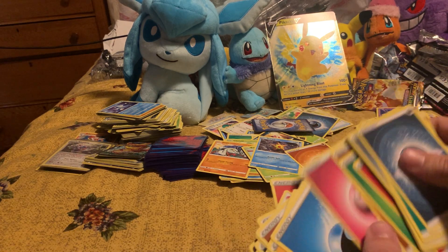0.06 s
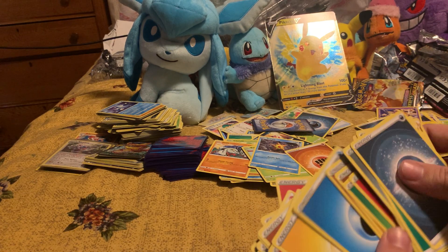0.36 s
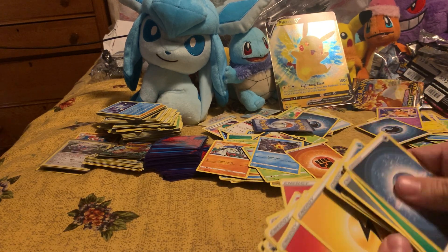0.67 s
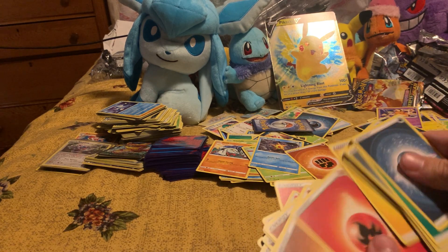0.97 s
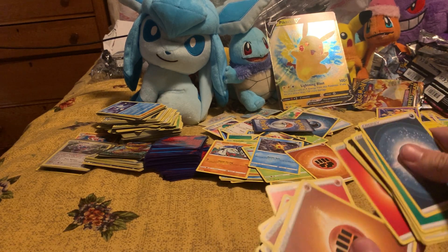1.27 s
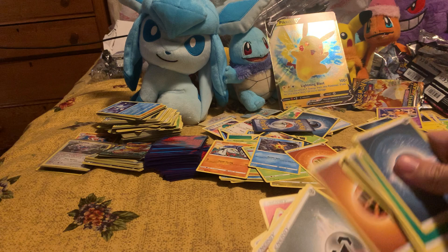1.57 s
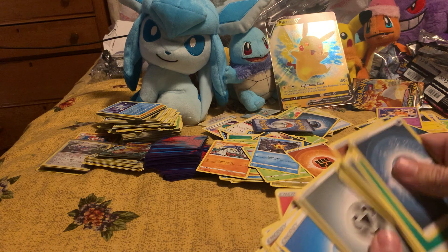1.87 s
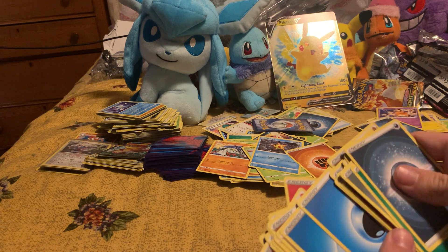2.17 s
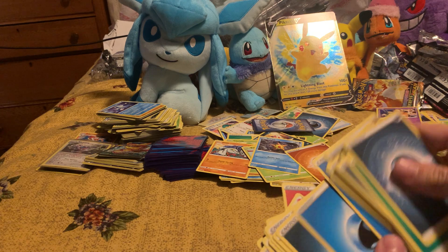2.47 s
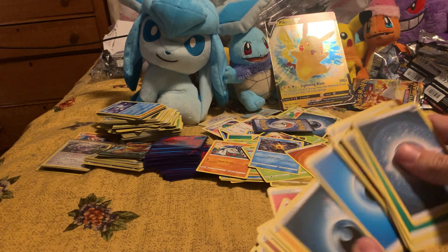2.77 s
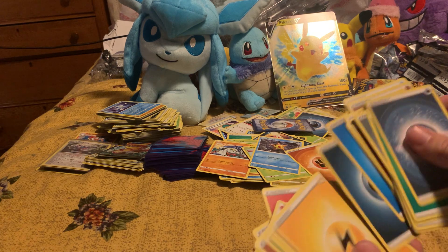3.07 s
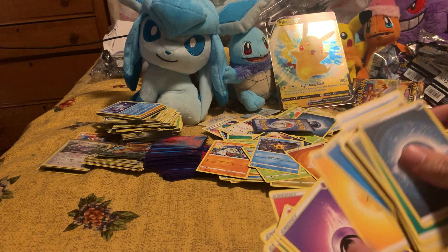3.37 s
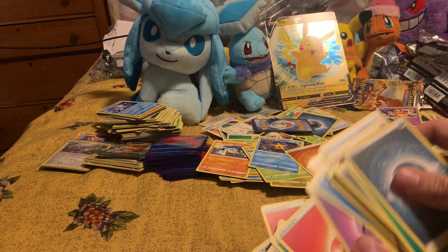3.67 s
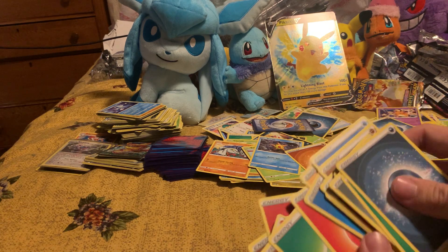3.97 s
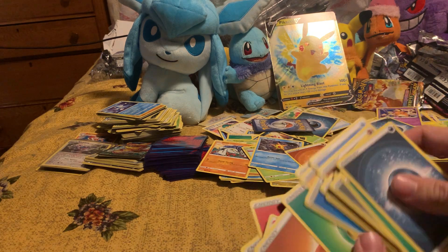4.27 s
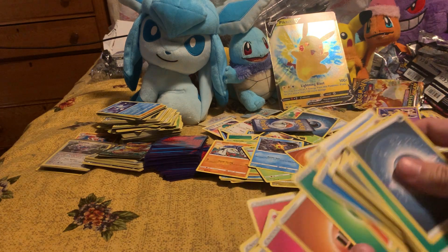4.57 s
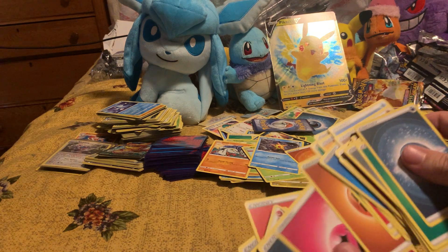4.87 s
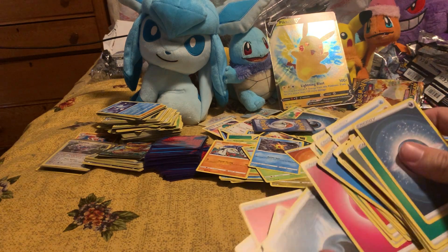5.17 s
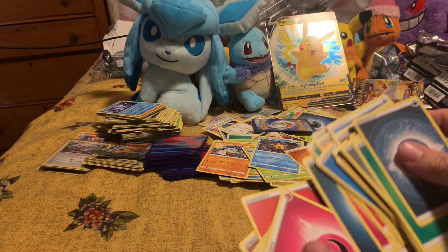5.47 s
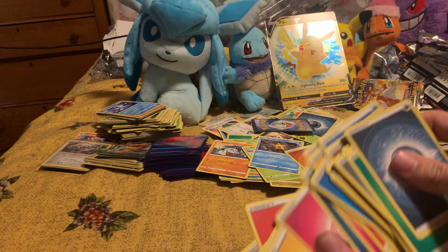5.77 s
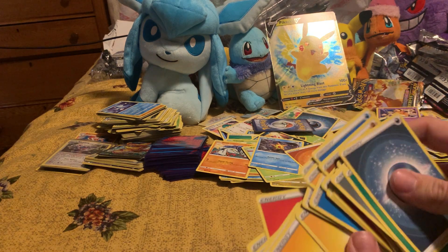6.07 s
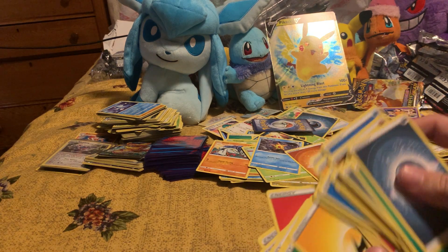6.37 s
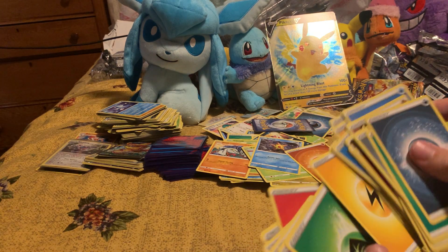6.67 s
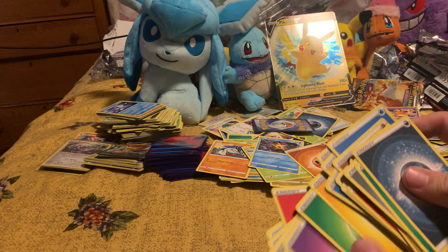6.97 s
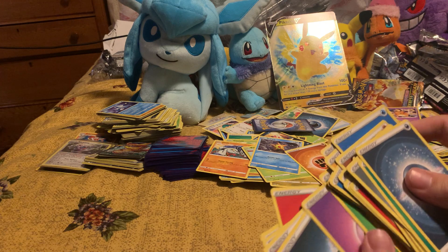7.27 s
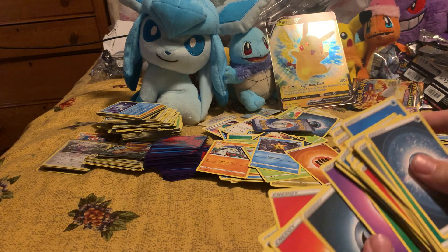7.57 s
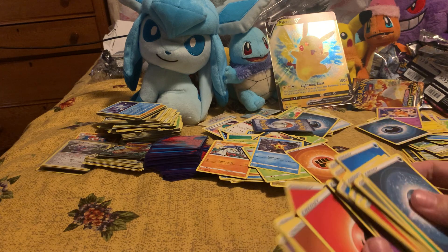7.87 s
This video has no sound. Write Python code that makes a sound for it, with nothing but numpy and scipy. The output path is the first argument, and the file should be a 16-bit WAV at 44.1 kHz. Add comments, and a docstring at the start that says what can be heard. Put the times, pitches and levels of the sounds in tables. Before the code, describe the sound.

Close to a stereo microphone, trading cards are slid one by one across a handheld pack in quick, uneven, papery swishes with light clicks. Dull bumps from a padded table come mostly early on. One card snaps about two seconds in, and another gives a sharper click late, as the sliding goes on. The small room adds only soft air and a very faint whine.

```python
"""A small quiet room: someone thumbs through trading cards just above a cloth-covered table.
Each card hisses over the next; edges tick as they spring free, and a few cards catch and snap
against the pack. Arms nudge the table, which rumbles and thuds, over room air and a faint whine.
A close two-port microphone hears the hands with a different phase and level on each side."""
import sys
import numpy as np
from scipy import signal
from scipy.fft import rfft, irfft, next_fast_len
from scipy.io import wavfile
from scipy.ndimage import uniform_filter1d, map_coordinates

SR = 44100
rng = np.random.default_rng(int(sys.argv[2]) if len(sys.argv) > 2 else 0)


def persist_wave(psi):
    """Save psi, clipped to +-1, as 16-bit WAV."""
    counts = np.round(np.clip(psi, -1, 1) * 32767).astype(np.int16)
    wavfile.write(sys.argv[1], SR, np.atleast_2d(counts).T)


N = 349051

# The room's faint whine. Each row: pitch in Hz, relative level in dB.
WHINE_TONES = [(490, -76.5), (570.6, -77.5), (790, -78.5), (1147, -84), (2347, -91.5)]
# An arm shifts on the table. Each row: strongest push in seconds, relative level in dB,
# rise and fall in seconds.
ARM_SHIFTS = [(0, -41, 0.049, 0.15), (0.24, -47, 0.16, 0.061), (0.323, -47, 0.029, 0.16),
              (0.851, -38, 0.042, 0.11), (1.359, -39.7, 0.18, 0.069), (1.442, -36.5, 0.0085, 0.14),
              (1.926, -50, 0.17, 0.21), (3.163, -56, 0.15, 0.027), (3.455, -44, 0.16, 0.094),
              (3.612, -39.5, 0.12, 0.34), (4.181, -52.1, 0.196, 0.129), (4.683, -51.5, 0.018, 0.17),
              (5.295, -46.5, 0.23, 0.33), (5.622, -42.5, 0.13, 0.32), (6.872, -47.5, 0.057, 0.42),
              (7.156, -50.5, 0.054, 0.26)]
# Soft thuds on the table. Each row: start in seconds, level in dB, pitch in Hz, t60 in seconds.
TABLE_BUMPS = [(0.322, -38, 162, 0.17), (0.343, -30, 76, 0.087), (.875, -32.5, 76, .15),
               (0.901, -35, 116, .05), (1.451, -26, 76, 0.17), (1.479, -30.5, 66.5, 0.14),
               (3.681, -36, 66, .24), (6.999, -36.5, 101, 0.13)]
# One card slides. Each row: fastest slip in seconds, relative hiss level in dB,
# rise and fall in seconds, rasp against hiss in dB before their trims.
CARD_STROKES = [(.011, -51.5, .14, .07, -15), (.192, -53, .11, .21, -14.5), (.345, -50, .02, .12, -14.5),
                (.491, -52, .04, .04, -18), (.569, -50.5, .03, .05, -14), (.693, -34.5, .046, .1, -18),
                (.885, -38, .036, .14, -15), (1.066, -44.5, .12, .14, -13.5),
                (1.277, -38.5, .07, .085, -24), (1.426, -38, .04, .083, -18.5), (1.66, -39, .1, .024, -18),
                (1.81, -40.5, .1, .07, -20.5), (2.03, -31, .096, .037, -16.5),
                (2.181, -38, .15, .11, -18.5), (2.342, -31.5, .026, .066, -25),
                (2.545, -48.5, .1, .11, -14), (2.738, -51, .074, .06, -13.5),
                (2.864, -47, .05, .095, -20.5), (3.045, -50.5, .09, .1, -15),
                (3.186, -45.5, .032, .056, -19.5), (3.255, -47.5, .042, .11, -21),
                (3.452, -50, .1, .13, -17), (3.616, -41.5, .078, .066, -20), (3.776, -43.5, .058, .13, -21),
                (3.9, -36, .046, .044, -27), (3.981, -45, .11, .045, -21), (4.128, -46.5, .03, .09, -19.5),
                (4.335, -40, .07, .03, -22), (4.486, -47.5, .038, .042, -19),
                (4.603, -50.5, .067, .065, -14), (4.673, -43, .03, .057, -22.5),
                (4.861, -57, .058, .25, -14), (5.053, -47, .146, .02, -22), (5.194, -52.5, .037, .07, -15),
                (5.376, -46, .127, .046, -21), (5.526, -51, .09, .055, -19.5),
                (5.688, -47, .075, .068, -18), (5.872, -61, .16, .12, -15), (6.075, -45, .05, .11, -18.5),
                (6.28, -51.5, .12, .044, -14), (6.407, -42.5, .048, .2, -21),
                (6.606, -36.5, .04, .058, -17.5), (6.765, -42, .09, .15, -14), (6.925, -54, .012, .045, -2),
                (7.014, -49, .054, .08, -13), (7.186, -55, .048, .19, -15), (7.391, -60.5, .03, .17, -16.5),
                (7.581, -45, .055, .067, -18.5), (7.688, -48, .11, .13, -14),
                (7.872, -52.5, .035, .12, -10)]
# An edge touches or springs free. Each row: start in seconds, relative level in dB,
# pitch of the flexed card in Hz, level offset of its ring in dB.
EDGE_TICKS = [(.338, -41.5, 1100, -12), (.656, -42, 4200, -10), (.762, -37, 4200, -4), (.81, -38, 2800, 0),
              (.8135, -31.5, 5400, -1), (1.079, -45, 2900, 3), (1.161, -45, 12500, 5),
              (1.402, -38, 12500, 8), (1.8837, -25.5, 3750, 3), (1.885, -31, 1500, 5),
              (2.332, -38, 1150, -5), (2.615, -44, 1050, 2), (3.173, -44, 12500, 3), (3.496, -44, 2600, 2),
              (3.59, -42, 12500, 8), (4.1255, -45, 12500, 10), (4.186, -48, 1100, 4),
              (5.395, -43, 12500, 11), (6.108, -44, 2400, 1), (6.2143, -37.5, 2900, -9),
              (6.593, -39, 12500, 2), (6.9025, -29, 2300, 2), (6.905, -12.5, 7200, -10),
              (6.9066, -24, 2350, 7), (6.9108, -27, 2350, 2), (7.048, -37, 3000, -3),
              (7.1576, -50, 3000, -3), (7.196, -45, 12500, 5), (7.667, -43, 1150, 2), (7.762, -48, 4000, 5)]
# A harder release crackles more briefly. Each row: tick level in dB, t60 in seconds.
TICK_DECAY = [(-50, .022), (-25, .013), (-13, .0045)]
# A card lands flat. Each row: start in seconds, relative level in dB, gain of the hollow modes in dB.
CARD_SLAPS = [(.8175, -40.5, 0), (1.8845, -29.5, -11), (2.252, -42, -14), (2.334, -46, -12),
              (3.82, -45, -10), (6.367, -48, -10), (6.405, -42, -7), (6.9066, -19.5, -10),
              (6.9138, -25, 1.5), (7.762, -47, -5)]
# Damped modes of the held pack. Each row: pitch in Hz, relative level in dB, t60 in seconds.
PACK_MODES = [(360, 0, .034), (465, -6, .025), (660, -7, .018), (800, -7, .02), (960, -4, .016),
              (1150, -3.5, .02), (1450, -8, .018), (2200, -10, .014)]

# Tone colours of room air, arms, card gloss, card face, held pack, card stock and reverb.
# Each row: frequency in Hz, gain in dB.
AIR_EQ = [(20, -15), (35, -7), (60, -2.5), (100, 1.5), (250, 2.5), (400, -0.5), (550, -3.5), (650, -12),
          (800, -7.5), (1100, -14), (1700, -13), (3500, -40), (7000, -33.5), (14000, -27.5)]
RUMBLE_EQ = [(15, -48), (30, -11), (45, 0), (62, 1), (85, -3.5), (110, -11), (170, -24), (300, -43),
             (800, -72)]
HISS_EQ = [(2500, -50), (5000, -19), (6500, -9.3), (8200, -3.8), (10000, -1.3), (11500, 0), (14000, 0),
           (16000, -1.5)]
RASP_EQ = [(1200, -50), (2100, -8.5), (2600, -2.5), (3200, -5.5), (4000, 0), (5000, -0.5), (6500, 0),
           (8500, -21), (12000, -44)]
SCUFF_EQ = [(150, -27), (400, -6), (800, 1), (1150, 0.5), (1550, -7), (2200, -1), (3200, -16.5),
            (6000, -44)]
STOCK_EQ = [(200, -16), (1000, -3), (2000, -3), (3200, -10), (5000, -5), (7000, 0), (12000, 2),
            (16000, .5)]
REVERB_EQ = [(300, -3), (1200, -1), (2500, 0), (6000, -1), (13000, -9)]

# Phase between the ports. Each row: frequency in Hz, lead of the left in radians.
PORT_LEAD = [(0, 0), (300, .3), (800, -.8), (1400, -3.2), (2500, -3.3), (3250, -6.1), (4500, -7),
             (5100, -9.6), (5900, -12.4), (6900, -12.5), (9600, -9.42), (13100, -6.3), (16000, -3.6)]
# Balance of the ports. Each row: frequency in Hz, left over right in dB.
PORT_BALANCE = [(100, 0), (400, 2), (1100, -1.5), (1800, -1), (3000, 0.5), (4500, 3.5), (5400, 3),
                (6500, -0.5), (16000, 1)]
# How alike the ports sound. Each row: frequency in Hz, coherence from 0 to 1.
PORT_COHERENCE = [(60, .87), (250, .76), (600, .2), (1200, .15), (2200, .88), (2900, .6), (3600, .88),
                  (5000, .5), (6500, .95), (7600, .88), (9600, .995), (12000, .94), (16000, .9)]
# The room's decay. Each row: frequency in Hz, t60 in seconds.
ROOM_DECAY = [(100, .2), (400, .2), (1400, .25), (4000, .27), (15000, .17)]


def amp(db):
    """Decibels to gain."""
    return 10 ** (np.asarray(db) / 20)


def unit(x):
    """Scale to rms 1."""
    return x / np.sqrt(np.mean(x ** 2) + 1e-20)


def along(points, hz):
    """Read a curve on a log frequency axis."""
    freqs, values = np.transpose(points)
    return np.interp(np.log(hz + 1), np.log(freqs + 1), values)


def filtered(x, response):
    """Filter by a complex response, given as a function of Hz."""
    n = x.shape[-1]
    padded = next_fast_len(n + SR // 4)
    return irfft(rfft(x, padded) * response(np.fft.rfftfreq(padded, 1 / SR)), padded)[..., :n]


def wobble(rate):
    """A smooth random curve, rate knots a second."""
    return map_coordinates(rng.standard_normal(int(N * rate / SR) + 4), [np.arange(N) * rate / SR])


def add(track, start, sound):
    """Mix a sound into a track, start seconds in."""
    part = track[round(start * SR):][:len(sound)]
    part += sound[:len(part)]


def swells(peak, db, rise, fall, depth=1):
    """Joint envelope of gestures, each 20 * depth dB down one rise before and one fall after its peak."""
    t = np.arange(0, N, 32)[:, None] / SR
    away = np.abs((t - peak) / np.where(t < peak, rise, fall))
    each = amp(db - 20 * depth * away ** 1.75)  # between a point (1) and a bell (2)
    return np.interp(np.arange(N) / SR, t[:, 0], np.linalg.norm(each, axis=1))


def ports(x):
    """Sound reaches the two ports with different phase and level."""
    half = np.array([[.5], [-.5]])
    def response(hz):
        lead = np.interp(hz, *np.transpose(PORT_LEAD))
        return amp(half * along(PORT_BALANCE, hz)) * np.exp(1j * half * lead)
    return filtered(x, response)


def spread(pair, eq):
    """Colour two unrelated signals and blend them into partly coherent stereo of rms 1."""
    def response(hz):
        width = np.arccos(np.clip(along(PORT_COHERENCE, hz), -1, 1)) / 2
        return amp(along(eq, hz)) * [np.cos(width), np.sin(width)]
    mid, side = filtered(pair, response)
    return unit(ports(np.array([mid + side, mid - side])))


def room_tone():
    """A steady bed of air with a thin, wavering whine."""
    t = np.arange(N) / SR
    whine = sum(amp(db + 4) * np.sin(2 * np.pi * hz * t + 1.65 * wobble(7)) for hz, db in WHINE_TONES)
    return amp(-57) * spread(rng.standard_normal((2, N)), AIR_EQ) + whine


def arm_rumble(trim_db=-.5, rest_db=-64):
    """Arms on the padded table rumble faintly at rest and swell as they shift."""
    peak, db, rise, fall = np.transpose(ARM_SHIFTS)
    envelope = np.hypot(swells(peak, db + trim_db, rise, fall), amp(rest_db))
    return envelope * spread(rng.standard_normal((2, N)), RUMBLE_EQ)


def friction(eq, catches_per_s, catch_gain, flutter_db, grip_db):
    """Countless tiny slips, with sparser catches of single paper fibres and an unsteady grip."""
    catches = (rng.random(N) < catches_per_s / SR) * rng.standard_normal((2, N))
    slips = rng.standard_normal((2, N)) + catch_gain * unit(catches)
    return spread(slips * amp(flutter_db * wobble(200) + grip_db * wobble(48)), eq)


def shifting_gap(x, depth_db):
    """The gap between the cards changes shape, so broad peaks drift through their sound."""
    spectra = signal.stft(x, nperseg=512)[2]
    peaks = uniform_filter1d(rng.standard_normal(spectra.shape[1:]), size=7, axis=0)
    drift = unit(uniform_filter1d(peaks, size=14, axis=1))
    return unit(signal.istft(spectra * amp(depth_db * drift), nperseg=512)[1][:, :N])


def card_slides(hiss_trim_db=1.17, rasp_trim_db=2.37, scuff_db=-59, brisk_db=-37.5):
    """Each stroke swells and fades: the gloss hisses, the face rasps, the held pack scuffs."""
    peak, db, rise, fall, rasp_db = np.transpose(CARD_STROKES)
    gloss = swells(peak, db + hiss_trim_db, rise, fall)
    # The rasp swells less than the hiss, so the fastest slip is the brightest.
    face = swells(peak, db + rasp_db + rasp_trim_db, rise, fall, depth=.67)
    pack = amp(scuff_db) * (gloss / amp(brisk_db)) ** .35  # follows the hiss weakly
    hiss = friction(HISS_EQ, catches_per_s=900, catch_gain=.6, flutter_db=.8, grip_db=2)
    hiss = shifting_gap(hiss, depth_db=2)
    rasp = friction(RASP_EQ, catches_per_s=250, catch_gain=.45, flutter_db=.9, grip_db=1.1)
    rasp = shifting_gap(rasp, depth_db=2)
    scuff = friction(SCUFF_EQ, catches_per_s=90, catch_gain=.6, flutter_db=1.3, grip_db=1.5)
    scuff = shifting_gap(scuff, depth_db=1.8)
    return gloss * hiss + face * rasp + pack * scuff


def room_reverb(x):
    """The furnished room answers with a short tail, different at each port."""
    hz, t, noise = signal.stft(rng.standard_normal((2, SR // 2)), SR, nperseg=256)
    decay = amp(-60 * t / along(ROOM_DECAY, hz)[:, None])
    tail = signal.istft(noise * decay, SR, nperseg=256)[1]
    tail = np.pad(tail / np.linalg.norm(tail[0]), ((0, 0), (SR // 200, 0)))  # 5 ms pre-delay
    wet = signal.fftconvolve(x, tail, axes=1)[:, :N]
    return filtered(wet, lambda hz: amp(along(REVERB_EQ, hz)))


def table_bumps(attack_s=.00057):
    """An arm bumps the padded table: one low, damped tone a thud."""
    t = np.arange(SR // 3) / SR
    attack = 1 - np.exp(-t / attack_s)
    track = np.zeros(N)
    for start, db, hz, t60 in TABLE_BUMPS:
        add(track, start, amp(db - 60 * t / t60) * np.sin(2 * np.pi * hz * t) * attack)
    return track


def faint_touches(per_s=4, centre_hz=1500):
    """Light edge touches, scattered along the strokes and scaled to them; rows as in EDGE_TICKS."""
    rows = []
    for which, where, pitch in rng.random((round(per_s * N / SR), 3)):
        peak, db, rise, fall, _ = CARD_STROKES[int(which * len(CARD_STROKES))]
        start = peak + .5 * (where * (rise + fall) - rise)
        rows.append((start, db - 3, centre_hz * 2 ** (pitch - .5), -6))
    return rows


def edge_ticks():
    """An edge lets go with a tick and a short crackle, coloured by the flexed card's broad resonance."""
    t = np.arange(SR // 10) / SR
    crackle, flex = np.zeros(N), np.zeros(N)
    for start, db, hz, ring_db in list(EDGE_TICKS) + faint_touches():
        t60 = np.interp(db, *np.transpose(TICK_DECAY))
        burst = amp(-60 * t / t60) * rng.standard_normal(len(t))
        burst[0] = 2.5  # the sharp transient
        ring = signal.lfilter(*signal.iirpeak(hz, Q=3.5, fs=SR), burst) * np.sqrt(SR / hz)
        add(crackle, start, amp(db) * burst)
        add(flex, start, amp(db + ring_db - 6) * ring)
    return ports(filtered(crackle, lambda hz: amp(along(STOCK_EQ, hz))) + flex)


def pack_slaps(attack_s=.00016, hollow_below_hz=600):
    """A card lands flat on the pack, whose damped modes sound mostly on the right."""
    t = np.arange(SR // 5) / SR
    attack = 1 - np.exp(-t / attack_s)
    track = np.zeros(N)
    for start, db, hollow_db in CARD_SLAPS:
        for hz, mode_db, t60 in PACK_MODES:
            gain = amp(db + mode_db + hollow_db * (hz < hollow_below_hz) + rng.standard_normal())
            ring = np.sin(2 * np.pi * hz * t + rng.uniform(0, 2 * np.pi))
            add(track, start, gain * ring * amp(-60 * t / t60) * attack)
    return ports(track) * amp([[-4.5], [3]])


def early_reflections(x, count=60, t60=.062):
    """Hands, table and things on it throw back copies within 30 ms."""
    delays = rng.uniform(.002, .03, (2, count))
    gains = rng.standard_normal((2, count)) * amp(-60 * delays / t60)
    echoes = np.array([np.bincount((d * SR).astype(int), g, SR // 20) for d, g in zip(delays, gains)])
    echoes /= np.linalg.norm(echoes, axis=1, keepdims=True)
    return signal.fftconvolve(x, echoes, axes=1)[:, :N]


def scene():
    """Cards in the hand, the table under them, the room around."""
    hits = edge_ticks() + pack_slaps()
    slides = card_slides()
    early = amp(-18) * early_reflections(hits)
    reverb = room_reverb(amp(-16.5) * hits + amp(-22) * slides)
    return hits + slides + early + reverb + table_bumps() + arm_rumble() + room_tone()


def record(dry):
    """A brick-wall high cut takes off the very top."""
    return filtered(dry, lambda hz: hz < 15850)


dry = scene()
out = record(dry)
persist_wave(out)
```